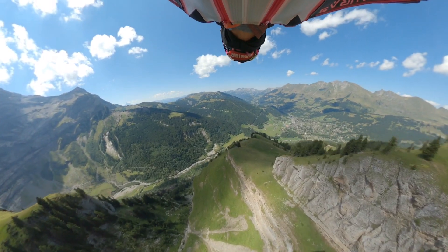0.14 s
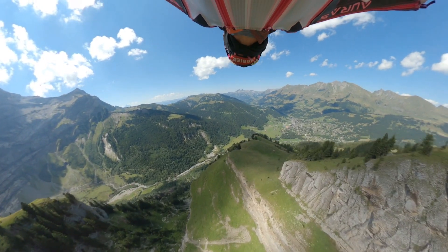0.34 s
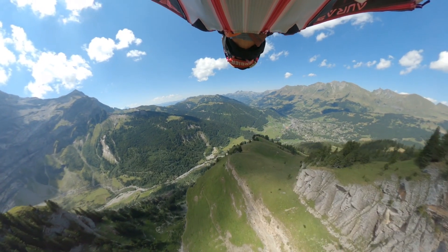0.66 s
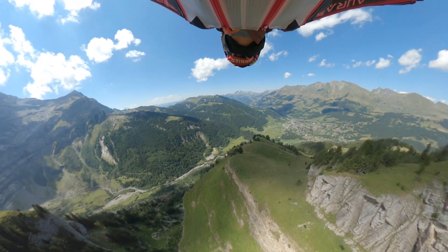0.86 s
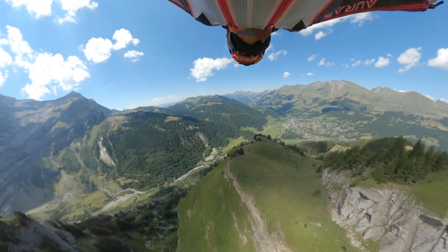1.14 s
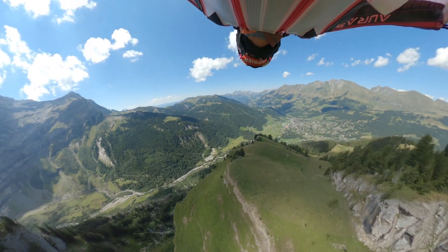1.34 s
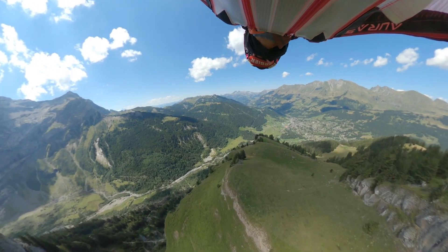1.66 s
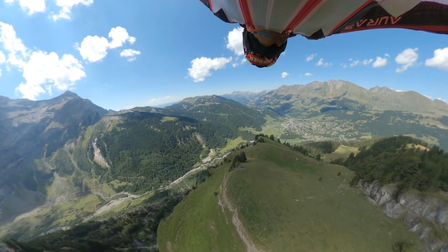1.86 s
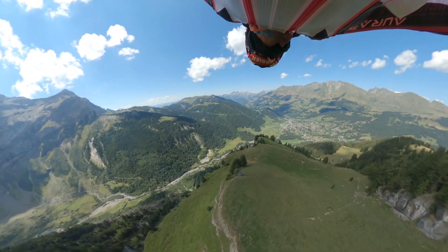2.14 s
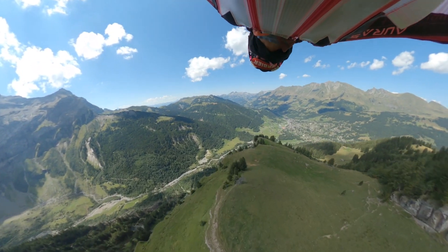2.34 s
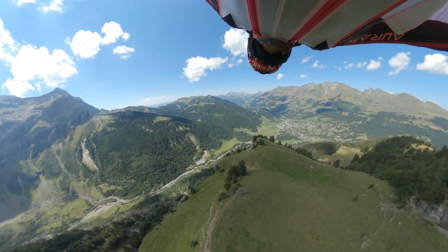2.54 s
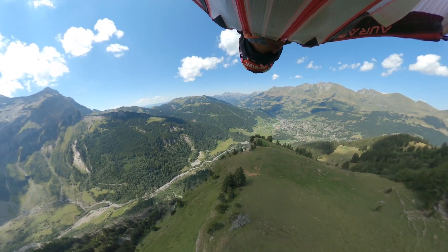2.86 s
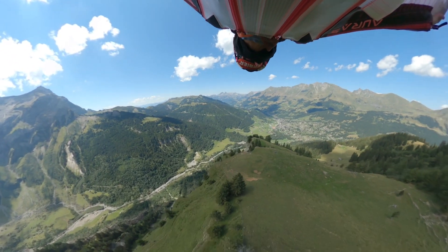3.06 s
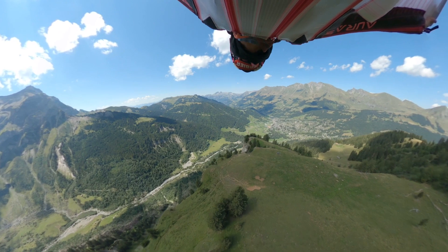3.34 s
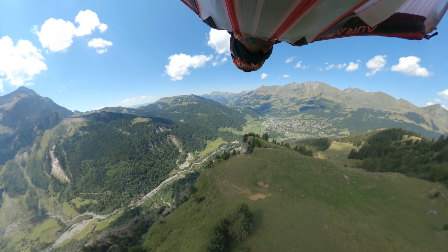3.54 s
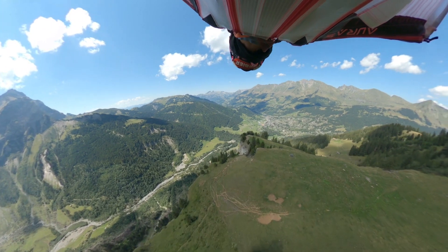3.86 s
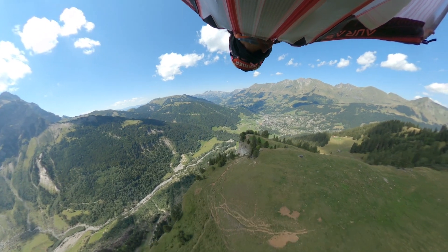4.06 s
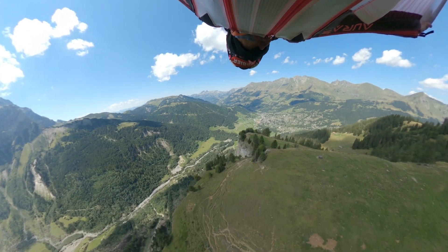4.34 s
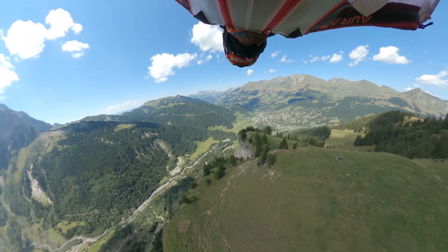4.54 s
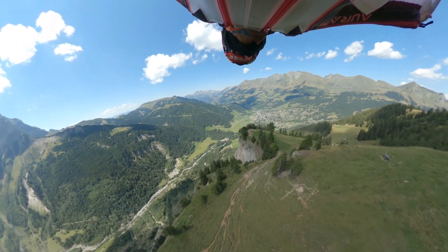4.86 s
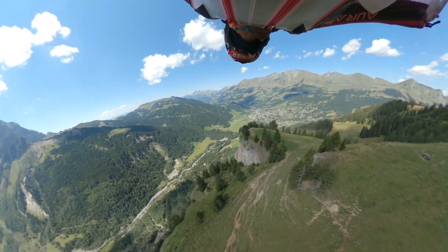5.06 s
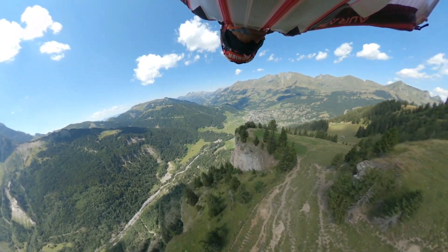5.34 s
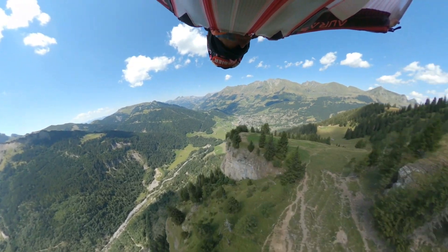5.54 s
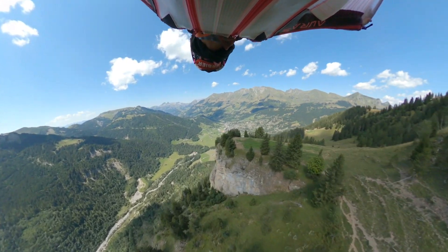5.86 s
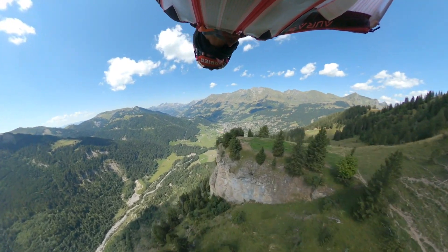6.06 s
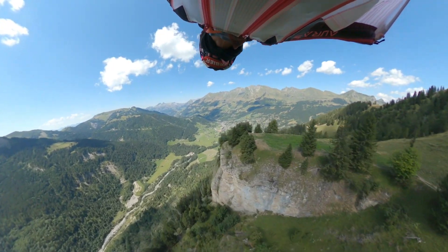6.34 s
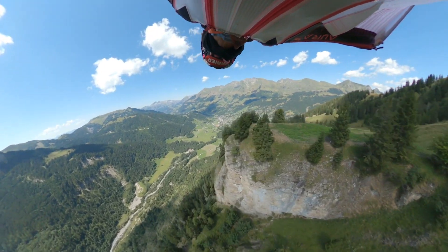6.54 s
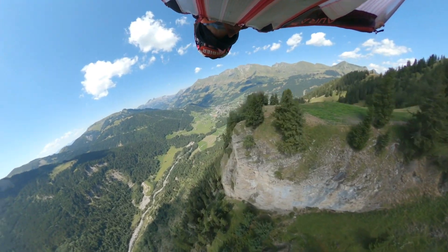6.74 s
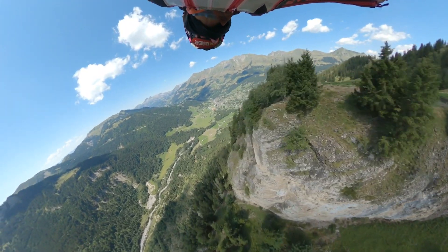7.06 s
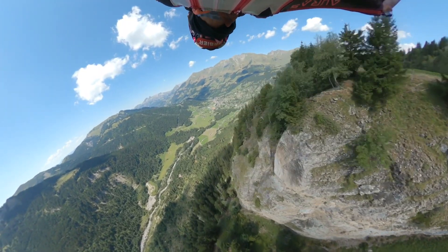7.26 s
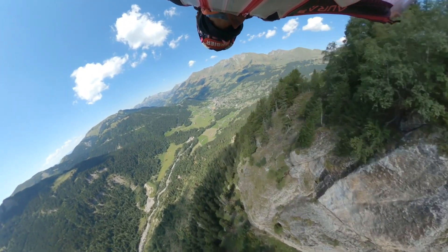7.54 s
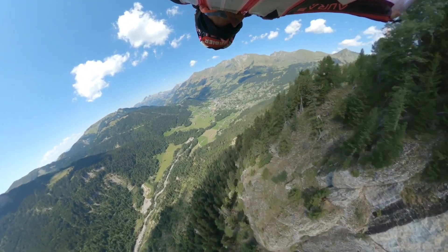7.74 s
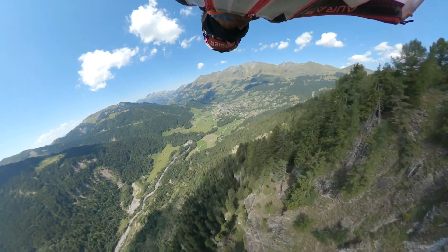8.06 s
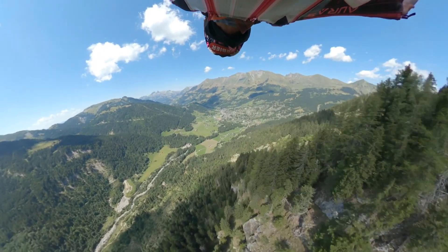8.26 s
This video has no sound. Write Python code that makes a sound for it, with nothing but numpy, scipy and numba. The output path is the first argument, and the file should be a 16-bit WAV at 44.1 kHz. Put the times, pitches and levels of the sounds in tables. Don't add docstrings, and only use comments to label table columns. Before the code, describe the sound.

Open air, high above a mountain valley: close, dense wind tears over a small camera microphone worn by a flyer. Low buffets and a throaty rumble flutter irregularly, swelling early, turning choppy around five seconds, then dropping a little at six. Short rough gusts follow near seven, and the rush carries on to the end with its loudest thumps squashed.

```python
import sys
import numpy as np
from scipy import signal
from scipy.fft import rfft, irfft
from scipy.io import wavfile
from scipy.ndimage import uniform_filter1d
from numba import njit

SR = 44100
rng = np.random.default_rng(int(sys.argv[2]) if len(sys.argv) > 2 else 0)


def output_pcm(signal):
    pcm = np.clip(np.atleast_2d(signal).T, -1, 1) * 32767
    wavfile.write(sys.argv[1], SR, np.round(pcm).astype(np.int16))


def how_loud(loudness_db):
    steps = np.asarray(loudness_db, float) / 20
    return 10 ** steps


N = 370440
T = np.arange(N) / SR
F = np.maximum(np.arange(N // 2 + 1) * SR / N, 1)


def unit(x):
    return x / np.sqrt(np.mean(x ** 2))


def walk(rate_hz):
    hold = int(SR / rate_hz)
    steps = np.repeat(rng.standard_normal(N // hold + 1), hold)
    slewed = uniform_filter1d(uniform_filter1d(steps, hold), hold)
    return unit(slewed[:N])


def noise(gain):
    return irfft(rfft(rng.standard_normal(N)) * gain, N)


def resonance(hz, width_hz):
    return 1 / (1 + (2 * (F - hz) / width_hz) ** 2)


# pitch_hz, level_db (per Hz)
TURBULENCE = [(12, -7.5), (30, -4.5), (70, -1), (120, 0), (210, -7), (400, -17), (750, -26), (1100, -32),
              (2150, -38.5), (4100, -42.5), (5400, -49), (9300, -70), (12000, -75.5), (15000, -92)]
# pitch_hz, width_hz, lift_db
PORT = [(1510, 340, 1), (3970, 510, 1.5)]


def wind_colour():
    hz, level_db = np.transpose(TURBULENCE)
    port_db = sum(lift_db * resonance(hz, width_hz) for hz, width_hz, lift_db in PORT)
    return how_loud(np.interp(np.log(F), np.log(hz), level_db) + port_db)


# start_s, level_db (above cruising)
FLOW = [(0.0, -0.5), (1.0, 0.4), (1.35, 0.9), (2.5, 1.3), (2.9, 0.3), (3.4, 0.65), (4.5, 0.1), (5.4, 0.7),
        (6.1, -2.5), (6.5, -2), (7.25, -2), (7.9, -1.8), (8.4, 0.2)]
# pitch_hz, answer_db_per_db
ANSWER = [(35, -0.8), (85, 0.06), (170, 0.46), (420, 0.12), (1050, 0.72), (7500, 1.16), (10500, 1.7)]
# centre_s, length_s, lift_db, pitch_hz
GUSTS = [(0.05, .15, 0, 35), (0.699, .25, 1.5, 150), (0.9, .25, -3.5, 35), (1.099, .12, -3, 90),
         (1.38, .08, 3, 90), (1.6, .25, -4.5, 35.2), (1.87, .12, 3, 450), (2.399, .15, 2, 40),
         (2.55, .1, 3, 100), (2.9, 0.32, 4, 170), (3.251, .06, 2.5, 300), (3.5, .12, 2, 200),
         (4.25, .25, 1.5, 189), (4.55, .2, -4, 39.9), (5.15, .15, -4, 80), (5.417, .15, 6, 450),
         (5.42, .2, 5.5, 40), (5.544, .05, 4.5, 400), (5.62, .1, 1.5, 110), (5.743, .08, 8.5, 352),
         (5.86, .08, 4, 250), (6.12, .12, -5, 80), (6.55, .55, -4.5, 140), (7.038, .06, 4, 301),
         (7.139, 0.093, 7, 450), (7.24, 0.086, 5, 250), (6.952, 0.13, 4, 450), (7.72, .2, 3.5, 140.6),
         (8.092, .08, -4.5, 200), (8.3, .2, -5, 100)]


def wind():
    flow_db = np.interp(T, *np.transpose(FLOW))
    answer_hz, answer = np.transpose(ANSWER)
    centre_s, length_s, lift_db, centre_hz = np.transpose(GUSTS)
    bells = np.exp(-((T - centre_s[:, None]) / (0.5 * length_s[:, None])) ** 2)
    colour = wind_colour()
    out = 0
    surge = walk(24)
    for octave in np.arange(7, 29) / 2:
        reach = np.exp(-(octave - np.log2(centre_hz)) ** 2)
        gust_db = np.interp(octave, np.log2(answer_hz), answer) * flow_db + (lift_db * reach) @ bells
        surge = 0.8 * surge + 0.6 * walk(14)
        lumpy_db = 0.13 + 0.87 * np.exp(-(octave - 8.3) ** 2 / 2)
        heave_db = 1.5 / (1 + (2 ** octave / 150) ** 2)
        level_db = gust_db + lumpy_db * surge + heave_db * walk(9) + 0.36 * walk(30)
        band = np.cos(np.pi * np.clip(np.log2(F) - octave, -0.5, 0.5))
        out = out + how_loud(level_db) * noise(band * colour)
    return unit(out) * how_loud(-16)


# pitch_hz, width_hz, level_db
SLIT = [(12000, 1100, -0.5), (13300, 1200, -9), (14800, 1400, -20)]


def whistle():
    leak_s, open_s, shut_s, edge_s = 5.79, 6.06, 6.424, 0.006
    leak_db, pop_db, hold_db = -76.5, -51.5, -74
    pop_fall_db_per_s, swell_db_per_s = 190, 23.5
    ring = sum(how_loud(level_db) * resonance(hz, width_hz) for hz, width_hz, level_db in SLIT)
    low_cut = 1 / (1 + (10900 / F) ** 60)
    since_s = np.maximum(T - open_s, 0)
    is_open = uniform_filter1d(1.0 * (T > open_s) * (T < shut_s), int(edge_s * SR))
    pop = is_open * how_loud(pop_db - pop_fall_db_per_s * since_s) * unit(noise(ring * low_cut))
    leak = (T > leak_s) * (T < open_s) * how_loud(leak_db + 2.5 * walk(60))
    swell = is_open * how_loud(hold_db + swell_db_per_s * np.minimum(since_s, 1))
    jet = (swell + leak) * unit(noise(ring ** 1.4 * low_cut))
    sputter = how_loud(3 * walk(300) - 1.5)
    return sputter * (pop + jet)


def scene():
    return (wind() + whistle())[None]


@njit
def follow(x, attack, release):
    envelope = np.empty(len(x))
    level = 0.0
    for i in range(len(x)):
        peak = abs(x[i])
        level += (peak - level) * (attack if peak > level else release)
        envelope[i] = level
    return envelope


def roll_off(x):
    return signal.sosfilt(signal.butter(12, 15700, fs=SR, output="sos"), x)


def record(dry):
    attack_s, release_s, threshold_db = 0.0049, 0.06, -10.5
    peak = follow(dry[0], 1 / (attack_s * SR), 1 / (release_s * SR))
    gain = np.minimum(1, how_loud(threshold_db) / (peak + 1e-9)) ** 0.5
    gain = uniform_filter1d(gain, size=128)
    held = np.tanh(0.9 * dry * gain) / 0.88
    return roll_off(held)


dry = scene()
out = record(dry)
output_pcm(out)
```